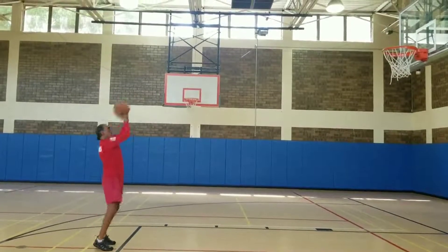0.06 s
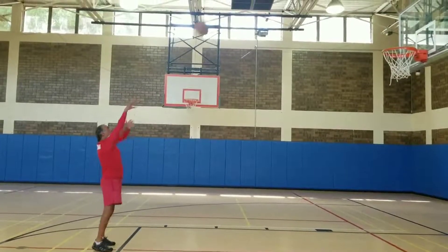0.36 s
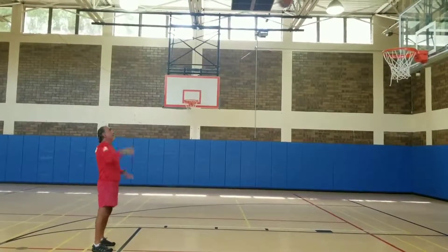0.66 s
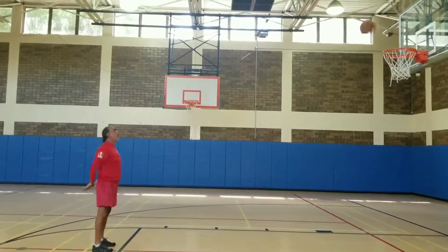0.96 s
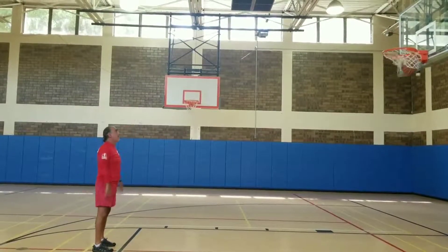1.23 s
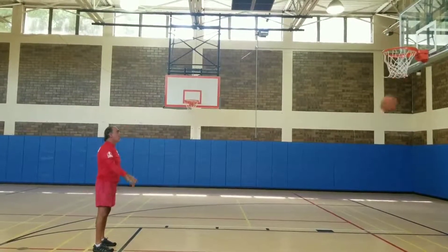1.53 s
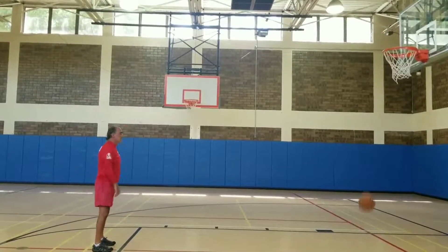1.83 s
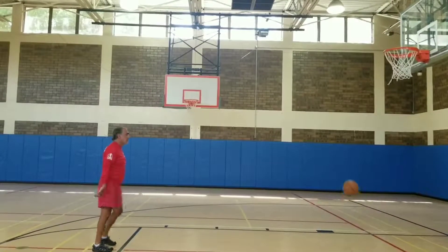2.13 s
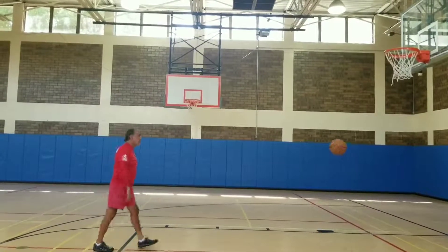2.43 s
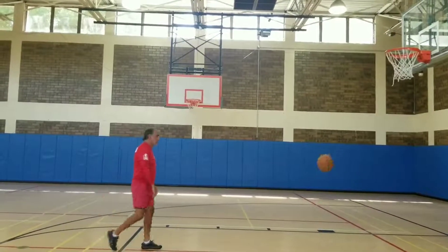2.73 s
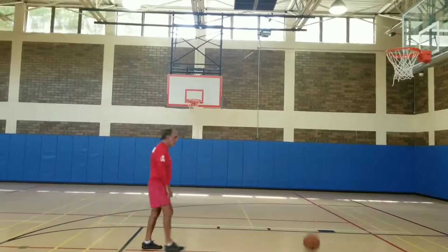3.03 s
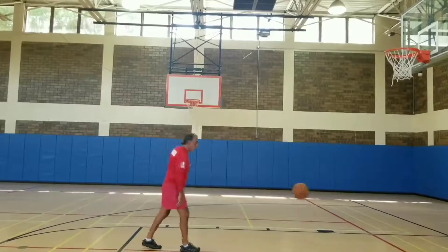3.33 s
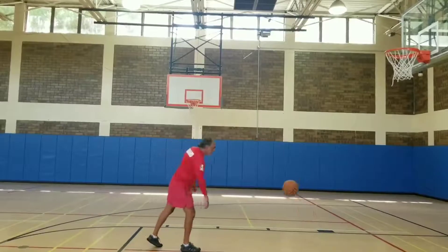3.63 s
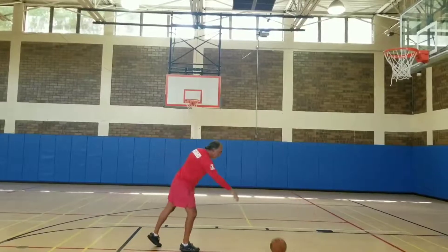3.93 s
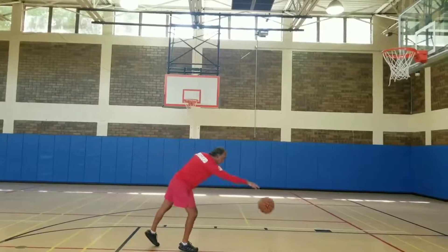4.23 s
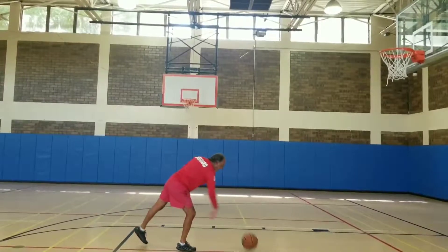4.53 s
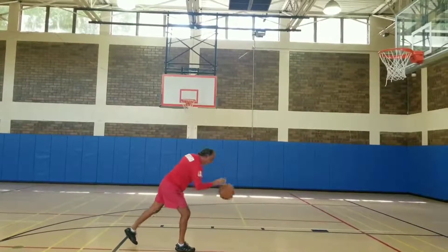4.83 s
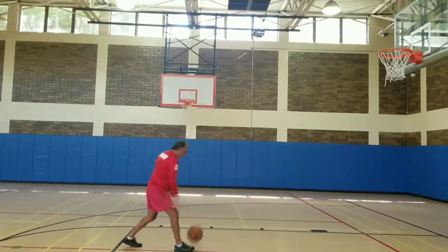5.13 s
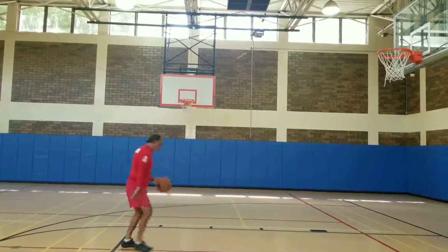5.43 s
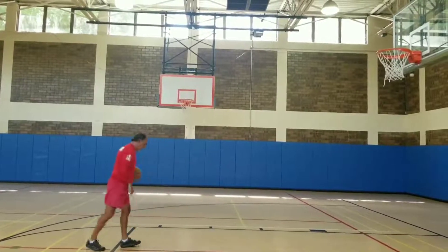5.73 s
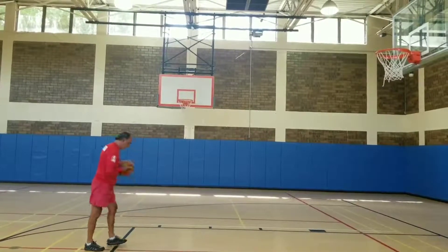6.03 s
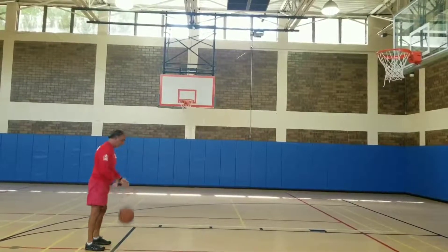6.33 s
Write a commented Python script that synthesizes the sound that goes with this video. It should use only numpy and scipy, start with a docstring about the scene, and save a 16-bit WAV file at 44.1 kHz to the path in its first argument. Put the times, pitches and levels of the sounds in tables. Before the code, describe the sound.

Ventilation rumbles low in a large, reverberant gym. After a faint rustle of clothes, a basketball knocks through the net and lightly rattles the rim. Three fading bounces thump and slap on the wooden floor, followed by two crisper dribbles, each led by a soft pat of the palm. The bounces sit slightly left of the microphones and echo for two to three seconds, with quiet steps and ball handling at the end.

```python
"""Ventilation rumbles in a large gym and clothes rustle as a player throws a basketball.
The ball drops through the net, tugging the cords and shaking the steel rim, bounces three times on a
sprung hardwood floor and is dribbled twice. Each bounce is a low thump, a sharp slap and a short ping
of the air in the ball; the near walls throw it back and the gym rings for two to three seconds.
Hands and shoes add soft pats and brushes."""
import sys
import numpy as np
from scipy import signal
from scipy.fft import rfft, irfft, next_fast_len
from scipy.io import wavfile
from scipy.ndimage import map_coordinates

SR = 44100
rng = np.random.default_rng(int(sys.argv[2]) if len(sys.argv) > 2 else 0)


def wrap_up_sound(samples):
    """Save the sound to the file named by the first command line argument, as 16-bit audio."""
    columns = np.atleast_2d(samples).T
    # keep every value between -1 and 1, then stretch to whole-number steps
    tamed = np.clip(columns, -1, 1)
    steps = np.round(tamed * 32767).astype(np.int16)
    wavfile.write(sys.argv[1], SR, steps)


N = 284886
TIME = np.arange(N) / SR
BANDS_HZ = np.geomspace(80, 16000, 64)  # EQ points for the slap
LEAD_S = .004  # pre-roll ahead of each floor contact


def undb(db):
    """Decibels to gain."""
    return 10 ** (np.asarray(db) / 20)


def pan(db):
    """Left and right gains for a level difference, left minus right."""
    return undb(np.array([[db], [-db]]) / 2)


def along(hz, points, values):
    """Values joined by straight lines on a log-frequency axis."""
    return np.interp(np.log(np.maximum(hz, 1)), np.log(points), values)


def bell(centre_hz, octaves):
    """A bell curve of height 1 across the slap's EQ points."""
    return np.exp(-(np.log2(BANDS_HZ / centre_hz) / octaves) ** 2)


def colour(x, spectrum, size=8192):
    """Minimum-phase EQ from rows of freq_hz, gain_db."""
    log_gain = np.log(undb(along(np.fft.rfftfreq(size, 1 / SR), *np.transpose(spectrum))))
    cepstrum = irfft(log_gain) * np.r_[1, np.full(size // 2 - 1, 2), np.zeros(size // 2)]
    response = irfft(np.exp(rfft(cepstrum)))[:size // 2]
    return np.apply_along_axis(lambda row: signal.oaconvolve(row, response)[:len(row)], -1, x)


def add(out, x, start_s):
    """Mix x into out from start_s on."""
    start = max(int(start_s * SR), 0)
    out[..., start:start + x.shape[-1]] += x[..., :max(out.shape[-1] - start, 0)]


def ring(modes, t, t60_s):
    """Damped modes from rows of pitch_hz, level_db; every blow varies each by a decibel or so."""
    tones = sum(undb(db + rng.standard_normal()) * np.sin(2 * np.pi * hz * t) for hz, db in modes)
    return tones * np.exp(-np.log(1000) * t / t60_s)


def diffuse(count, apart_hz=1350):
    """Noise from all around on two close microphones: narrow in the bass, wide in the treble."""
    size = next_fast_len(count)
    mid, side = rfft(rng.standard_normal((2, size)))
    width = np.clip(np.fft.rfftfreq(size, 1 / SR) / apart_hz, .085, 1)
    left_right = np.array([mid + width * side, mid - width * side]) / np.hypot(1, width)
    return irfft(left_right, size)[:, :count]


def ventilation(rumble_db=-42.5, swell_db=2.5, swells_per_s=6.3):
    """Duct rumble whose bass swells and dips, under two faint fan tones."""
    # duct noise EQ: freq_hz, gain_db
    duct_eq = [(20, -23.5), (36, -10), (54, -2), (70, -3.5), (95, -13), (130, -10.5), (190, -19),
               (280, -29.5), (420, -34), (700, -48.5), (1200, -52.5), (2500, -55), (5000, -89.5)]
    # fan hum: pitch_hz, rms_db
    fan_tones = [(54.7, -43), (190.5, -59)]
    rumble = colour(diffuse(N), duct_eq)
    hum = sum(np.sqrt(2) * undb(db) * np.sin(2 * np.pi * (hz * TIME + rng.random()))
              for hz, db in fan_tones)
    swell = map_coordinates(rng.standard_normal(size=128), [TIME * swells_per_s], mode="mirror")
    bass = signal.sosfiltfilt(signal.butter(2, 130, fs=SR, output="sos"), rumble)
    rumble = rumble + (undb(swell_db * swell) - 1) * bass
    return rumble / rumble.std() * undb(rumble_db) + hum


def hall(build_s=0.0094, bass_build_s=0.0181, early_db=4.0, early_s=0.0982):
    """The gym's reverb from one spot: reflections thicken, then die away, the top end first."""
    # diffuse tail: freq_hz, level_db, t60_s
    tail_bands = [(50, 15, 2.136), (86.7, 3.5, 3.5), (125, -12.5, 2.1), (177.3, 0.5, 1.31),
                  (293.4, -2.5, 1.257), (417, 4, 1.715), (706, 1, 2.44), (1183, 3, 2.863), (2460, 5, 3.053),
                  (4123, 4.5, 2.555), (5998, -1.5, 1.844), (8540, -1.5, 1.245), (10990, -8.5, 0.86),
                  (15000, -6.5, 0.38)]
    t = TIME[:3 * SR]
    hz, s, cells = signal.stft(diffuse(len(t)), SR, nperseg=512)
    points, dbs, t60s = np.transpose(tail_bands)
    decay_rate = np.log(1000) / along(hz, points, t60s)[:, None]
    gain = undb(along(hz, points, dbs))[:, None] * np.sqrt(2 * decay_rate / SR)
    # small things nearby scatter the treble at once; the bass returns only from the walls
    wait_s = along(hz, [250, 1500], [bass_build_s, 1 / SR])[:, None]
    arrived = 1 - np.exp(-(s / wait_s) ** 2)
    tail = signal.istft(cells * gain * arrived * np.exp(-decay_rate * s), SR)[1][:, :len(t)]
    return tail * (1 - np.exp(-t / build_s)) * undb(early_db * np.exp(-t / early_s))


def in_gym(x, direct_db, pan_db):
    """A small source, panned dry, plus its reverb."""
    return undb(direct_db) * pan(pan_db) * x + signal.fftconvolve(hall(), x[None], axes=1)[:, :N]


def bursts(cues, swell_s, fade_s, gain_db=0):
    """Give cues of peak_s, level_db one shared swell and fade."""
    return [(s, swell_s, fade_s, db + gain_db) for s, db in cues]


def rubbing(rows, grain_db):
    """Friction as bursts of dense uneven grains, from rows of peak_s, swell_s, fade_s, energy_db."""
    power = np.zeros(N)
    for s, swell, fade, db in rows:
        envelope = np.exp(2 * np.minimum((TIME - s) / swell, (s - TIME) / fade))
        power += undb(2 * db) / (SR * (swell + fade) / 2) * envelope
    noise = rng.standard_normal(N)
    grains = noise * undb(grain_db * np.repeat(rng.standard_normal(N // 32 + 1), 32)[:N])
    return np.sqrt(power) * grains / grains.std()


def player():
    """Foley: clothes flap and rustle, shoes pad, palms meet the ball and slide on its skin."""
    # clothes moving with the throw and the walk: peak_s, level_db
    rustles = [(.05, -21.5), (1.82, -9), (4.17, -14), (5.8, -22)]
    # soft footfalls: peak_s, level_db
    steps = [(1.923, -5), (4.856, -9.5), (6.28, -17)]
    # palms on the ball: peak_s, level_db
    hands = [(4.438, -7.5), (5.01, -7.5), (5.56, -18), (6.134, -19)]
    # dull pat EQ: freq_hz, gain_db
    pat_eq = [(80, -16), (220, 10.5), (450, 7.5), (1000, 3.5), (2000, 4.5), (6000, -34)]
    # airy brush EQ: freq_hz, gain_db
    brush_eq = [(300, -14.5), (1500, -3), (3000, -1), (6000, 1), (11000, -6.5), (15500, -16.5)]
    palm, cloth = dict(swell_s=.0152, fade_s=.0415), dict(swell_s=.108, fade_s=.143)
    footfalls = bursts(steps, swell_s=.011, fade_s=.0207)
    pats = bursts(hands, **palm) + footfalls + bursts(rustles, **cloth, gain_db=-1.5)
    brushes = bursts(hands, **palm, gain_db=-6) + bursts(rustles, **cloth)
    pat = colour(rubbing(pats, grain_db=5.5), pat_eq)
    brush = colour(rubbing(brushes, grain_db=1.5), brush_eq)
    return in_gym(undb(-4.5) * (pat + brush), direct_db=-3.0, pan_db=5.0)


def hoop():
    """The ball tugs the net, which shakes the rim; the cords whip as it slips out, then sway to rest."""
    # tugs on the net: peak_s, level_db
    tugs = [(1.103, -17.5), (1.162, 0), (1.189, 5), (1.213, 5), (1.27, -3)]
    # knock of the net, EQ: freq_hz, gain_db
    knock_eq = [(150, 10), (280, -0.5), (380, 9.5), (550, 3), (1000, 6.5), (1500, 2), (2500, -23.5),
                (5000, -38.5), (12000, -31)]
    # swish of the cords, EQ: freq_hz, gain_db
    swish_eq = [(300, -12), (1200, -4.5), (2500, 0.5), (4000, -4.5), (6300, -8), (8000, -9.5), (12500, -19),
                (15500, -30)]
    # steel rim, damped by the net: pitch_hz, level_db
    rim_modes = [(345, 0.5), (390, 0.5), (485, -7), (696, 1), (1000, -13.5), (1265, -2), (1560, -18),
                 (2480, -6.5), (2545, -18)]
    # the rim's brackets, which sing on: pitch_hz, level_db
    bracket_modes = [(2478, -9.5), (2492, -2.5), (2548, -3.5)]
    t = TIME[:SR]
    tug = dict(swell_s=.008, fade_s=.017)
    whip = bursts([(1.213, 9.48)], swell_s=.0099, fade_s=.0485)
    sway = bursts([(1.3444, -4.5)], swell_s=.04, fade_s=.01)
    knock = rubbing(bursts(tugs, **tug), grain_db=4.5)
    swish = rubbing(bursts(tugs, **tug, gain_db=-11) + whip + sway, grain_db=3.5)
    steel = undb(-49.0) * ring(rim_modes, t, t60_s=.12) + undb(-63.5) * ring(bracket_modes, t, t60_s=.8)
    rim = signal.fftconvolve(knock, steel)[:N]
    basket = colour(knock, knock_eq) + rim + colour(swish, swish_eq)
    return in_gym(undb(-0.5) * basket, direct_db=-1.5, pan_db=-0.5)


def crack(t, decay_s, span_s=0.01085):
    """A few milliseconds of tiny contacts, even in spectrum, with energy 1."""
    spectrum = rfft(rng.standard_normal(len(t)) * (t >= LEAD_S) * np.exp(-np.abs(t - LEAD_S) / decay_s))
    burst = irfft(spectrum / np.abs(spectrum), len(t)) * np.exp(-((t - LEAD_S) / span_s) ** 2)
    return burst / np.linalg.norm(burst)


def slap_eq(strength_db, sharp_db, snap_db, boost_db=18.5):
    """The slap's tone: a driven ball is sharper than a falling one, with less knock and more smack."""
    # rubber meeting varnished wood: freq_hz, gain_db
    contact_eq = [(80, -19.5), (250, 16), (450, -8.5), (620, 0), (900, 3), (1400, 2), (2100, 2.5),
                  (3200, -2.5), (4500, -3), (6400, -2), (10000, -6.5), (13000, -12.5), (15500, -27.5)]
    # knock of wood, smack of trapped air, snap of pebbled skin: centre_hz, width_octaves
    colours = [(850, 0.543), (5800, 0.64), (12000, 0.294)]
    knock_db, smack_db = -1.6 * sharp_db, 0.41 * sharp_db
    bells_db = sum(db * bell(*band) for db, band in zip((knock_db, smack_db, snap_db), colours))
    contact_db = along(BANDS_HZ, *np.transpose(contact_eq))
    return np.c_[BANDS_HZ, strength_db + boost_db + sharp_db + contact_db + bells_db]


def floor_thump(age, strength_db, boards_db, boards_hz, length_s=0.0121, rise_s=0.00133):
    """The ball flattens and pushes the floor for about a cycle and a half, and the boards ring."""
    # sprung floorboards: pitch_ratio, level_db
    board_modes = [(.79, 3), (1, -1.5), (1.3, -1), (1.65, -8), (2.54, -10.5), (3.1, -5)]
    pitch_hz = 137.42 + 1.133 * strength_db  # a harder bounce stiffens the ball
    thump = np.sin(2 * np.pi * pitch_hz * age) * np.exp(-(age / length_s) ** 4.14)
    boards = undb(boards_db) * ring([(boards_hz * k, db) for k, db in board_modes], age, t60_s=.06)
    return (thump + boards) * (1 - np.exp(-age / rise_s))  # the soft ball takes a moment to load the floor


def ball_ping(age):
    """The air inside the ball rings briefly."""
    # air cavity modes: pitch_hz, level_db
    air_modes = [(890, -7), (958, -1), (1300, -6.5), (1556, -11.5), (2130, -12.5), (2520, -12.5),
                 (3010, -12.5), (3700, -39.5)]
    return ring(air_modes, age, t60_s=.09)


def bounces(body_lag_s=0.000573, right_lag_s=.000025, beam_db=6, off_beam_db=-2.5, reverb_db=1.39):
    """Each floor hit layers slap, thump and ping; the near walls and then the hall answer."""
    # floor hits, with boards and ping relative to strength:
    # start_s, strength_db, sharp_db, snap_db, beam_hz, boards_db, boards_hz, ping_db, pan_db
    hits = [(1.9985, -8, -1.09, 0.5, 1390, -12, 244.2, -22.5, 0.92),
            (3.1144, -12.5, -0.5, -1.5, 5790, -16, 242.9, -21, 6.5),
            (3.9967, -19, -2, -3, 2090, -19.5, 411.5, -20.5, 6.2),
            (4.5815, -14, 1.87, 2, 5960, -25.5, 286.7, -17, 7.13),
            (5.2173, -12.5, 3, -5, 3170, -17, 291.3, -28.5, 2.8)]
    # first wall echoes: delay_s, body_db, slap_db, pan_db
    echoes = [(0.024, -2.5, -7, -7), (0.0312, -7, -34, 13), (0.0589, -10.5, -8, -2)]
    # padded walls swallow the top: freq_hz, gain_db
    wall_eq = [(5000, -1), (15000, -7)]
    out, t = np.zeros((2, N)), TIME[:SR // 2]
    age = np.maximum(t - LEAD_S - body_lag_s, 0)
    for s, strength_db, sharp_db, snap_db, beam_hz, boards_db, boards_hz, ping_db, pan_db in hits:
        thump = floor_thump(age, strength_db, boards_db, boards_hz)
        body = undb(strength_db) * (thump + undb(ping_db) * ball_ping(age))
        tone = slap_eq(strength_db, sharp_db, snap_db)
        slap = colour(crack(t, decay_s=.001372), tone)
        # the closing gap under the ball beams one band of the slap at the microphones
        beam_eq = np.c_[BANDS_HZ, off_beam_db + beam_db * bell(beam_hz, octaves=.51)]
        left, right = body + pan(pan_db) * colour(slap, beam_eq)
        start_s = s - LEAD_S
        add(out[0], left, start_s)
        add(out[1], right, start_s + right_lag_s)
        for delay_s, body_db, slap_db, side_db in echoes:
            # uneven walls smear the slap, differently on each side
            smear = np.array([crack(t, decay_s=.0026) for _ in out])
            slapback = colour(colour(smear, tone), wall_eq)
            add(out, undb(body_db) * body + undb(slap_db) * pan(side_db) * slapback, start_s + delay_s)
        add(out, signal.fftconvolve(hall() * undb(reverb_db), (body + slap)[None], axes=1), start_s)
    return out


def scene():
    """Ball, hoop and player over the room tone."""
    return bounces() + hoop() + player() + ventilation()


def record(dry, hiss_db=-75.0, top_hz=15700):
    """The microphones add hiss and their own colour; the recorder clips at full scale and cuts the top."""
    # deep bass rolls off, the ports resonate near 6 kHz and cancel near 8 kHz: freq_hz, left_db, right_db
    mic_eq = [(22, -15.5, -19), (41, -6.5, -4.5), (55.14, -0.5, 0), (300, -0.5, 0), (3210, -2.5, -2.5),
              (4753, -1, 1.5), (5803, 6, 9), (6385, 13.5, 1), (7023, 0, -1.5), (8170, -9.5, -11.5),
              (9150, 2.5, -2), (10666, 5, 9), (14600, 5, 6), (15900, 2.5, -6)]
    hz, *responses = np.transpose(mic_eq)
    hissy = dry + undb(hiss_db) * rng.standard_normal(dry.shape)
    heard = np.array([colour(x, np.c_[hz, db]) for x, db in zip(hissy, responses)])
    top_cut = signal.ellip(8, .2, 70, top_hz, fs=SR, output="sos")
    return signal.sosfilt(top_cut, np.clip(heard, -1, 1))


dry = scene()
out = record(dry)
wrap_up_sound(out)
```